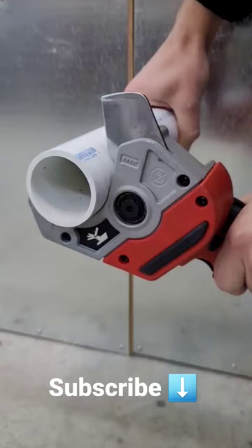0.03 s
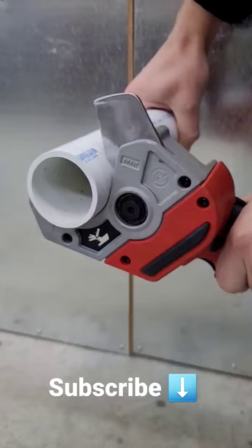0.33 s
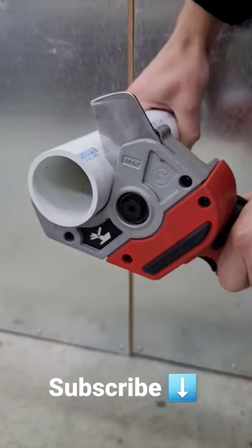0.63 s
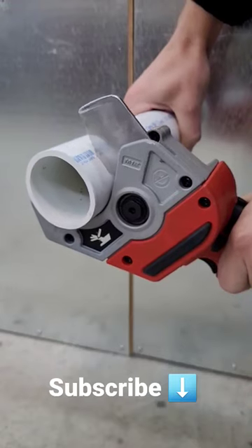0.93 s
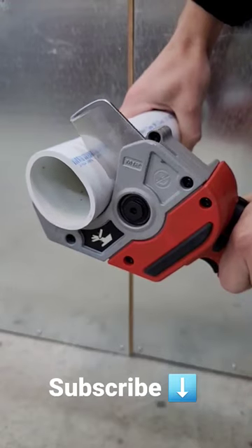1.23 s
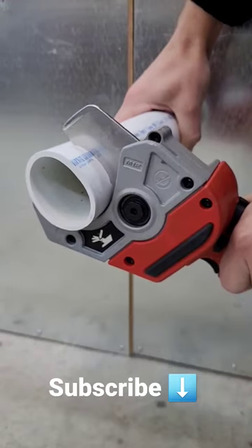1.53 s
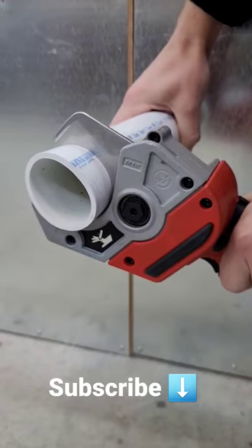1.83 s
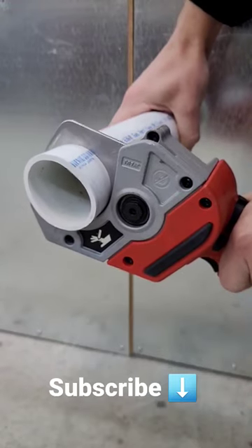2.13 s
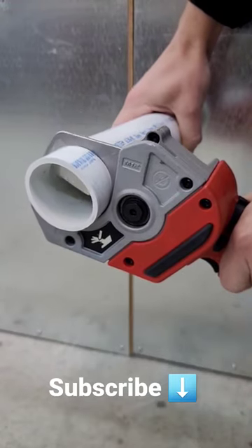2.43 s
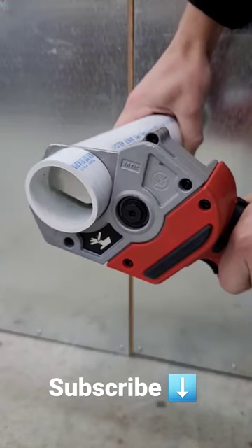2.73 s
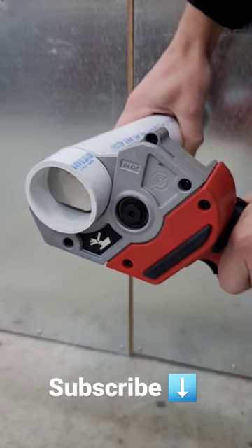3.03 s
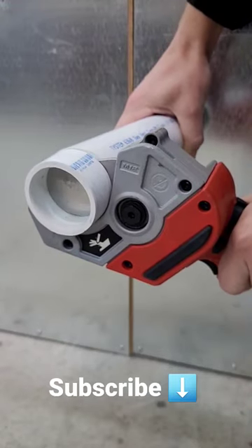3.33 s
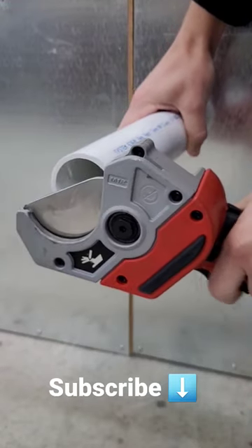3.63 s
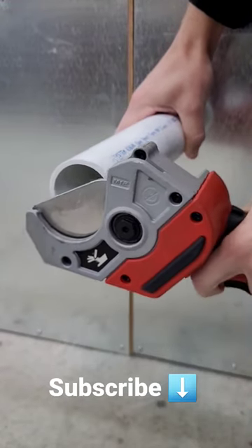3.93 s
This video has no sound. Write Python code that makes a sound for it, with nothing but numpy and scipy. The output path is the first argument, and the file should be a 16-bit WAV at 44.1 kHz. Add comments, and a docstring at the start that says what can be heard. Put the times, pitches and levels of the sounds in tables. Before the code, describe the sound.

A battery pipe cutter whines through a plastic pipe, which snaps off sharply.

```python
"""A battery shear, close up, drives its blade through a plastic pipe.
The motor spins up, the blade seats with a click, and the gears whine as the load drags the speed down.
One shaft speed sets the pitch of motor and gears, over the rasp of bearings and brushes.
The pipe snaps off, the blade rattles back, the motor brakes and the trigger clicks.
The room hums faintly underneath."""
import sys
import numpy as np
from scipy import signal
from scipy.fft import rfft, irfft, next_fast_len
from scipy.io import wavfile
from scipy.ndimage import uniform_filter1d, map_coordinates

SR = 44100
rng = np.random.default_rng(int(sys.argv[2]) if len(sys.argv) > 2 else 0)


def materialize(psi):
    """Save the field psi as 16-bit PCM at rate SR to the path in sys.argv[1].

    A 1-D psi becomes a single channel; in a 2-D psi each row is a channel.
    """
    bounded = np.clip(np.atleast_2d(psi).T, -1, 1)
    quanta = np.round(bounded * 32767).astype(np.int16)
    wavfile.write(sys.argv[1], SR, quanta)


N = 176400

START_S, STOP_S = 0.267, 3.715  # the motor starts and brakes
BITE_S, RELEASE_S, BREAK_S = 0.81, 3.47, 3.677  # the blade bites, the wall gives, the pipe parts
# bright noise of the drive's hiss and the pipe's cracks: freq_hz, density_db
HISS_SPECTRUM = [(2500, -20.5), (4500, 3), (6100, -2.5), (7100, 0), (8100, 0.5), (9200, -2.5), (10500, 0),
                 (11800, 3.5), (13400, -0.5), (14500, 2.5), (15500, -1.5)]


def motor(speed, turns):
    """Slightly rough shaft tones that grow with speed."""
    # shaft tones at full speed: multiple, level_db, growth_db_per_octave, pan_db
    partials = [(1, -42, 46, 2), (2, -49, 49, -1), (4, -53, 12, 2.5), (5, -53.5, -1, -2), (6, -50, 25, 0),
                (7, -57, 0, -2), (10, -46.5, 22, -13)]
    full_hz, weak_below_hz = 292, 216
    octaves = np.log2(speed / full_hz)
    weak_db = 15.5 * np.minimum(np.log2(speed / weak_below_hz), 0)
    hum = 0
    for k, db, growth_db, pan_db in partials:
        level = amp(db + growth_db * octaves + 3.4 * wobbles(17)) * pan(pan_db)
        rough = 1 + 0.2 * wobble(150)
        hum += level * rough * tone(k * turns + 0.034 * wobble(40), spread=0.33)
    return hum * amp(weak_db) * ramp(START_S, length=0.064)


def gears(speed, turns):
    """Loaded teeth whine at multiples of the mesh rate, with rough chatter and a gliding sizzle."""
    # housing resonances that tooth harmonics 1 and 4 sweep over: freq_hz, level_db
    housing = [(1100, -44), (1400, -44), (1650, -47), (1900, -37), (2120, -36), (2200, -38.5),
               (4420, -29.5), (4620, -31), (4800, -54), (5400, -51), (6200, -46), (9000, -60)]
    # swells of tooth harmonic 2: time_s, level_db
    second_swells = [(0.9, -42), (1.03, -35), (1.13, -33), (1.23, -18.5), (1.295, -34), (1.39, -21),
                     (1.46, -23), (1.505, -24), (1.525, -30), (1.55, -29), (1.645, -29.5), (1.665, -25),
                     (1.735, -30), (1.755, -24), (1.885, -19), (1.94, -25), (1.965, -30), (1.99, -21.5),
                     (2.045, -43), (2.08, -47.0), (2.105, -37), (2.145, -28), (2.22, -28.5), (2.24, -44),
                     (2.265, -31.0), (2.295, -50), (2.355, -19), (2.385, -28.5), (2.435, -23.5),
                     (2.465, -25.5), (2.505, -20.5), (2.545, -27.5), (2.68, -20), (2.735, -22.5),
                     (2.825, -27.5), (2.84, -23.5), (2.97, -27), (3.01, -23.5), (3.075, -31.0),
                     (3.17, -21.5), (3.235, -31), (3.275, -25), (3.295, -27.5), (3.34, -17.5),
                     (3.385, -27.5), (3.43, -18.5), (3.455, -26), (3.48, -36), (3.52, -25), (3.57, -28),
                     (3.605, -47.0), (3.67, -38)]
    # swells of tooth harmonic 3: time_s, level_db
    third_swells = [(0.9, -47), (1.285, -40), (1.325, -32.5), (1.53, -34), (1.575, -31.5), (1.765, -33.5),
                    (1.805, -26.5), (1.85, -29.5), (2.135, -31.5), (2.24, -35.5), (2.28, -50),
                    (2.655, -40.5), (2.91, -45), (3.025, -44), (3.065, -45), (3.125, -34.5), (3.46, -50),
                    (3.525, -24), (3.545, -30), (3.56, -23), (3.575, -28), (3.59, -23), (3.605, -31),
                    (3.625, -23.5), (3.67, -28)]
    # rattle of the teeth around the mesh harmonics: multiple, level_db
    chatter_bands = [(2, -40), (3, -42.5), (4, -43.5), (5, -43.5), (6, -46), (7, -46)]
    # resonances that colour the upper tooth harmonics: freq_hz, level_db
    sizzle_colour = [(4800, -52), (5400, -42), (6200, -49.5), (7200, -46), (8100, -40.5), (9000, -52),
                     (10000, -45), (11000, -49), (12000, -42.5), (13300, -46.5), (14700, -42.5),
                     (15800, -45)]
    mesh_per_turn = 7.5
    mesh_hz, teeth = mesh_per_turn * speed, mesh_per_turn * turns
    load = ramp(BITE_S, length=.09) * (1 - ramp(BREAK_S - .005, length=.004))
    rough = .13 + .47 * ramp(RELEASE_S, length=.05)  # harsher as the wall gives

    def whine(order, level_db, pan_db, spread):
        """One fluttering tooth harmonic."""
        flutter = amp(2 * wobbles(28.03)) * (1 + rough * wobbles(200)) / np.sqrt(1 + rough ** 2)
        return amp(level_db) * flutter * pan(pan_db) * tone(order * teeth + 0.061 * wobbles(60), spread)

    tones = (whine(1, along(housing, mesh_hz), pan_db=4.5, spread=0.94)
             + whine(2, curves(second_swells)[0] - 1.5, pan_db=-6, spread=1.33)
             + whine(3, curves(third_swells)[0], pan_db=-0.5, spread=1.72)
             + whine(4, along(housing, 4 * mesh_hz), pan_db=2, spread=1.3))
    chatter = sum(amp(db) * smeared(k * teeth, rate=800) for k, db in chatter_bands)
    sizzle = sum(amp(along(sizzle_colour, k * mesh_hz) + 2.5 * wobble(25)) * smeared(k * teeth, rate=420)
                 for k in range(4, 12))
    sizzle *= amp(-6 * ramp(RELEASE_S, length=.03))
    return load * (tones + chatter + sizzle)


def grind():
    """Bearings and brushes rasp in the housing: a gritty body under a hiss."""
    # drive noise through spin-up and cut: time_s, body_db, hiss_db
    swells = [(0.285, -38.5, -43), (0.307, -43.5, -40), (0.317, -42.5, -45), (0.361, -42, -43),
              (0.381, -40.5, -44), (0.489, -41, -40.5), (0.521, -34.5, -38.5), (0.541, -35.5, -34.5),
              (0.699, -36.5, -34.5), (0.77, -37, -32), (0.81, -37.5, -30), (0.93, -35.5, -33.5),
              (0.96, -34.5, -30), (0.97, -33.5, -28.5), (1.14, -30, -28.5), (1.2, -34, -30),
              (1.37, -31.5, -31), (1.71, -32.5, -33), (1.75, -31, -31.5), (1.93, -33.5, -30),
              (2.62, -32, -29), (2.65, -32, -30), (3.41, -32, -29), (3.67, -32, -32.5)]
    # body of the drive noise: freq_hz, density_db
    body_spectrum = [(100, -45), (220, -53), (400, -21.5), (620, -12), (900, -5), (1400, -6), (1900, -3),
                     (2120, 2), (2290, 4.5), (2480, 1), (2750, 3), (3500, 0.5), (4400, -4), (5300, -40),
                     (8000, -43)]
    body_db, hiss_db = curves(swells)
    hiss_db -= 45 * since(STOP_S)  # the hiss dies sooner than the body
    rasp = unit(np.exp(0.2 * wobble(2500)))
    body = amp(body_db + 4.5 + 1.58 * wobble(45)) * rush(body_spectrum)
    hiss = amp(hiss_db + 2.5 + 0.78 * wobble(60)) * patchy(rush(HISS_SPECTRUM), depth_db=1.8)
    return rasp * (body + hiss)


def commutator(turns):
    """Commutator tones climb with the motor, swelling and fading in turn."""
    # swells for each shaft multiple: time_s, level_db
    swells = { 3: [(.485, -63), (.52, -37.5), (.545, -44.5), (.59, -46.5), (.75, -39.5), (.95, -55),
              (1.15, -41), (1.5, -50), (1.75, -52.5), (2.0, -44.5), (2.3, -47), (2.38, -39), (2.65, -42),
              (3.1, -43.5), (3.42, -41.5), (3.52, -46), (3.6, -65)], 6: [(.32, -65), (.36, -55), (.48, -51),
              (.52, -72)], 9: [(.31, -60), (.37, -52), (.49, -48), (.53, -41), (.68, -46), (.735, -36.5),
              (.92, -37), (.98, -44), (1.2, -44), (1.4, -61)], }
    tones = 0
    for k, swell in swells.items():
        level = amp(curves(swell)[0]) * (1 + 0.2 * wobble(150))
        tones += level * tone(k * turns + 0.1 * wobble(90), spread=0.5)
    return tones * pan(-2.7)


def free_run(turns):
    """The unloaded motor sings thin and high, fading once the blade bites."""
    # high shaft tones: multiple, level_db
    partials = [(40, -48), (41, -46), (42, -49), (49, -45), (53, -41)]
    unloaded = ramp(.66, length=.08) * (1 - ramp(BITE_S, length=.25))
    return unloaded * sum(amp(db + 3.3 * wobbles(20.16)) * tone(k * turns + 0.13 * wobbles(80), 1.56)
                          for k, db in partials)


def squeal():
    """A brief, unsteady squeal as the gears take up."""
    # path of the squeal: time_s, pitch_hz, level_db
    glide = [(.28, 2260, -62), (.32, 2250, -42.5), (.42, 2276, -40.5), (.5, 2384, -43), (.58, 2530, -56)]
    hz, db = curves(glide)
    gate = db > glide[-1][2]
    level = amp(db) * gate * (1 + .5 * wobble(121.7))
    return level * pan(-8.5) * tone(np.cumsum(hz) / SR + .14 * wobble(122.4), spread=.3)


def clicks():
    """The blade seats with a sharp click; the trigger gives a softer one at the end."""
    # blade and trigger impacts: start_s, level_db
    blows = [(.783, -8), (.7847, -13.5), (3.8485, -24)]
    # ring of the mechanism: pitch_hz, level_db, t60_s
    modes = [(801, -42.5, 0.0084), (1843, -10, 0.033), (2580, 5, 0.0052), (3786, -6, 0.027),
             (4300, -11, 0.017), (6260, -11.5, 0.018), (12340, -5.5, 0.006)]
    low_cut_hz = 480
    ring = strikes(blows, modes, crack_db=-25, crack_t60=0.0067, spread=0.96)
    return filtered(ring, lambda hz: (1j * hz / (low_cut_hz + 1j * hz)) ** 2)


def snap():
    """The pipe parts with a hard snap and a few dull knocks."""
    # the pipe parting and the blade springing back: start_s, level_db
    snaps = [(3.6777, -26), (3.6792, -12.5), (3.6814, -12), (3.701, -26), (3.729, -23.5)]
    # ring of the snap: pitch_hz, level_db, t60_s
    snap_modes = [(630, -14, 0.046), (1350, -11.5, 0.023), (2320, 2, 0.031), (3310, -4, 0.03),
                  (4470, -8.5, .03), (6420, -11, .02)]
    # knocks of the pipe: start_s, level_db
    knocks = [(3.679, -32.5), (3.694, -32), (3.722, -32), (3.765, -37)]
    # low ring of the pipe: pitch_hz, level_db, t60_s
    knock_modes = [(258.5, -12, 0.2), (290, -1, 0.1), (375, -19, .04)]
    return (strikes(snaps, snap_modes, crack_db=-9, crack_t60=0.014, spread=1.0)
            + strikes(knocks, knock_modes, crack_db=-23, crack_t60=0.0106, spread=0.35))


def fracture():
    """One bright crack as the last of the pipe wall gives, then the rattle of the loose blade."""
    # bursts of the break and the rattle: start_s, level_db
    cracks = [(3.6774, -12.5), (3.681, -19), (3.69, -17), (3.696, -18), (3.703, -21), (3.714, -24),
              (3.72, -23)]
    t60_s = .016
    level = sum((clock() > s) * amp(db - 60 * since(s) / t60_s) for s, db in cracks)
    return level * rush(HISS_SPECTRUM)


def blade_return():
    """The blade scrapes as it springs open."""
    # colour of the scrape: freq_hz, density_db
    spectrum = [(88, -47), (150, -32), (244, -16), (708, -4.5), (1910, -2), (2360, -8), (3760, -4),
                (7410, -2), (9000, -7.5), (11600, -9), (15500, -16)]
    hold_s, fade_db_per_s = 0.026, 241
    level_db = -22.5 - fade_db_per_s * since(BREAK_S + hold_s) + 0.7 * wobble(500)
    return amp(level_db) * ramp(BREAK_S, length=0.0054) * rush(spectrum)


def puffs():
    """Short soft puffs of noise: one as the motor surges to full power, one early in the cut."""
    # swell of each puff: peak_s, half_length_s, level_db
    swells = [(0.515, 0.02, -34), (1.052, 0.017, -33.5)]
    # colour of a puff: freq_hz, density_db
    spectrum = [(250, -9), (560, 2), (700, 6), (900, -7), (1500, -7), (2400, 7), (4000, -18), (15000, -24)]
    return sum(amp(db) * np.exp(-((clock() - s) / half) ** 2) for s, half, db in swells) * rush(spectrum)


def room_echo(x):
    """A short echo off the workshop walls."""
    # tone of the echo: freq_hz, gain_db
    colour = [(200, 0), (3500, 2.5), (8000, 0), (15000, -7)]
    t60_s, wet_db = 0.35, -9
    t = np.arange(SR // 2) / SR
    tail = rng.standard_normal((2, len(t))) * amp(-60 * t / t60_s) * (t > .004)
    echo = signal.fftconvolve(x, tail / np.linalg.norm(tail[0]), axes=1)[:, :N]
    return filtered(echo, lambda hz: amp(wet_db + along(colour, hz)))


def room_tone():
    """Low rumble, mains hum and faint air."""
    # colour of the rumble: freq_hz, density_db
    rumble_spectrum = [(20, -44), (32, -11), (50, -4), (62, 8), (76, 0.5), (95, -11.5), (130, -8),
                       (180, -46), (400, -46)]
    # slow swells of the rumble: time_s, level_db
    rumble_swells = [(.15, -47.5), (.5, -49), (.7, -40), (.9, -46), (1.0, -53), (1.47, -47), (1.65, -51.5),
                     (1.85, -62), (2.0, -52), (2.6, -58), (4, -59)]
    # colour of the air: freq_hz, density_db
    air_spectrum = [(60, -17), (150, -6), (400, -14.5), (730, -12.5), (1100, -38), (1500, -28.5),
                    (1950, -18.5), (3000, -23.5), (5000, -29), (15000, -41)]
    mains_hz = 59.8
    hum = amp(-56 + 3 * wobble(5.9)) * tone(mains_hz * clock(), spread=0.14)
    rumble = amp(curves(rumble_swells)[0] - 0.5) * rush(rumble_spectrum)
    air = amp(-62) * rush(air_spectrum)
    return ramp(0.1356, length=0.0075) * (rumble + hum + air)


def strikes(blows, modes, crack_db, crack_t60, spread):
    """Each blow rings the modes and adds a short crack of noise."""
    out, t = np.zeros((2, N + SR)), np.arange(SR // 4) / SR
    for start_s, db in blows:
        ring = 0
        for hz, mode_db, t60 in modes:
            decay = amp(mode_db + rng.normal(0, 0.74) - 60 * t / t60)
            ring += decay * np.sin(2 * np.pi * hz * t + spread * rng.standard_normal((2, 1)))
        crack = amp(crack_db - 60 * t / crack_t60) * rng.standard_normal((2, len(t)))
        first = round(start_s * SR)
        out[:, first:first + len(t)] += amp(db) * (ring + crack)
    return out[:, :N]


def rush(spectrum):
    """Coloured stereo noise of rms 1, narrow in the bass and wide in the treble."""
    # likeness of left and right: freq_hz, correlation
    likeness = [(100, 0.9), (500, 1), (1000, 0.21), (2200, 0.24), (4000, -0.19), (8000, -0.1),
                (15000, 0.057)]
    # lean to the left: freq_hz, pan_db
    lean = [(60, -4.5), (99, 2), (160, -4), (270, 4), (450, 1), (740, -3), (1220, 2), (2010, -3.5),
            (3330, -4), (5500, 2.5), (9080, 0), (15000, -0.5)]

    def mid_side(hz):
        """Gains of the centre and the sides."""
        width = np.arccos(np.clip(along(likeness, hz), -1, 1)) / 2
        return amp(along(spectrum, hz)) * [np.cos(width), np.sin(width)]

    mid, side = filtered(rng.standard_normal((2, N)), mid_side)
    return unit(filtered(np.array([mid + side, mid - side]), lambda hz: pan(along(lean, hz))))


def patchy(x, depth_db):
    """Make a sound flicker in small patches of pitch and time."""
    bins = signal.stft(x, nperseg=512)[2]
    patches = uniform_filter1d(rng.standard_normal(bins.shape[1:]), size=4, axis=0)
    patches = uniform_filter1d(patches, size=5, axis=1)
    return unit(signal.istft(bins * amp(depth_db * unit(patches)), nperseg=512)[1][:, :N])


def tone(turns, spread):
    """A stereo sine of rms 1; spread is the phase between the channels in radians."""
    return np.sqrt(2) * np.sin(2 * np.pi * turns + spread * np.array([[.5], [-.5]]))


def smeared(turns, rate):
    """A narrow band of stereo noise that rides on a pitch."""
    return wobbles(rate) * np.sin(2 * np.pi * turns) + wobbles(rate) * np.cos(2 * np.pi * turns)


def wobble(rate):
    """A smooth random curve, rate knots a second."""
    return map_coordinates(rng.standard_normal(int(N * rate / SR) + 4), [clock() * rate])


def wobbles(rate):
    """A random curve for each channel."""
    return np.array([wobble(rate), wobble(rate)])


def filtered(x, response):
    """Shape x with a frequency response."""
    size = next_fast_len(N + SR // 2)
    return irfft(rfft(x, size) * response(np.fft.rfftfreq(size, 1 / SR)), size)[..., :N]


def along(points, hz):
    """Read (freq_hz, value) points on a log frequency axis."""
    freqs, values = np.transpose(points)
    return np.interp(np.log(hz + 1), np.log(freqs + 1), values)


def curves(rows):
    """One value per sample for each column after the time."""
    times, *columns = np.transpose(rows)
    return [np.interp(clock(), times, column) for column in columns]


def ramp(start, length):
    """A straight rise from 0 to 1."""
    return np.minimum(since(start) / length, 1)


def since(start):
    """Seconds after start, 0 before it."""
    return np.maximum(clock() - start, 0)


def clock():
    """Time of each sample."""
    return np.arange(N) / SR


def pan(db):
    """Left and right gains for a level difference; positive is left."""
    return np.array([np.atleast_1d(amp(db / 2)), np.atleast_1d(amp(-db / 2))])


def amp(db):
    """Decibels to gain."""
    return 10 ** (np.asarray(db) / 20)


def unit(x):
    """Scale to rms 1."""
    return x / np.sqrt(np.mean(x ** 2) + 1e-20)


def scene():
    """One shaft drives motor and gears until it brakes; only the clicks and the break echo."""
    # motor shaft speed: time_s, speed_hz
    shaft_speed = [(0.27, 55.3), (0.35, 92.8), (0.4, 108.6), (0.487, 133), (0.505, 172.3), (0.52, 197.3),
                   (0.55, 236), (0.6, 265), (0.65, 282.6), (0.75, 291.5), (0.85, 294.4), (0.95, 286.6),
                   (1.04, 268.5), (1.25, 216.1), (1.31, 205), (1.35, 199.2), (1.53, 180.8), (1.65, 177.7),
                   (1.69, 178.5), (1.75, 182.5), (1.97, 198.5), (2.07, 200.6), (2.12, 202.2), (2.18, 204.5),
                   (2.22, 204.4), (2.3, 207), (2.35, 211.2), (2.45, 213.1), (2.58, 212.4), (2.7, 216.9),
                   (2.75, 215.2), (2.84, 218), (2.9, 213.8), (2.95, 218.2), (3.04, 219.2), (3.06, 219.2),
                   (3.17, 221.3), (3.26, 219.9), (3.35, 220), (3.47, 212.8), (3.5, 200.3), (3.55, 179.6),
                   (3.6, 158.4), (3.63, 149.3), (3.655, 146), (3.68, 151.4), (3.9, 60)]
    jitter, brake_db_per_s = .0011, 141
    speed = curves(shaft_speed)[0] * (1 + jitter * wobble(35))
    turns = np.cumsum(speed) / SR
    running = ramp(START_S, length=0.016) * amp(-brake_db_per_s * since(STOP_S))
    hits = clicks() + snap() + blade_return() + fracture()
    drive = motor(speed, turns) + commutator(turns) + free_run(turns)
    drive += gears(speed, turns) + grind() + squeal()
    return running * drive + puffs() + hits + room_echo(hits) + room_tone()


def record(dry):
    """Clip the tallest peaks and roll off the very top steeply."""
    ceiling, top_hz, edge_hz = .88, 16050, 600
    roll_off = lambda hz: np.sin(np.pi / 2 * np.clip((top_hz - hz) / edge_hz, 0, 1)) ** 2
    return filtered(np.clip(dry, -ceiling, ceiling), roll_off)


dry = scene()
out = record(dry)
materialize(out)
```